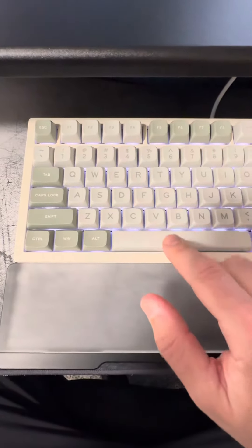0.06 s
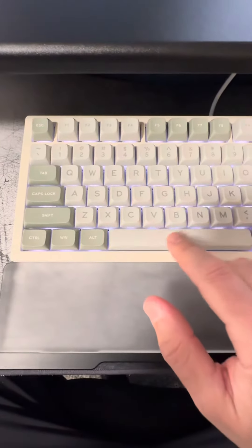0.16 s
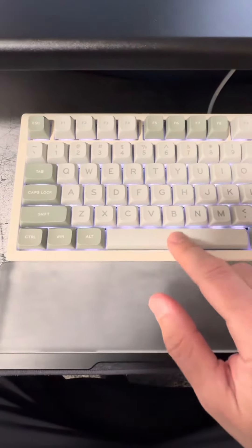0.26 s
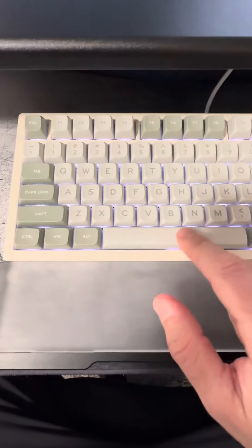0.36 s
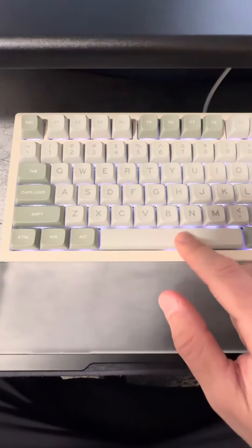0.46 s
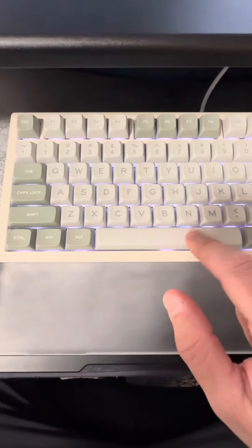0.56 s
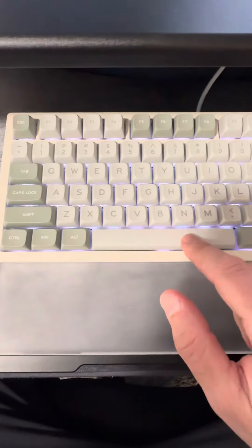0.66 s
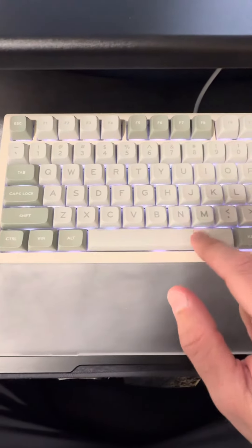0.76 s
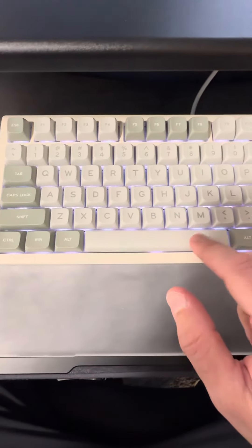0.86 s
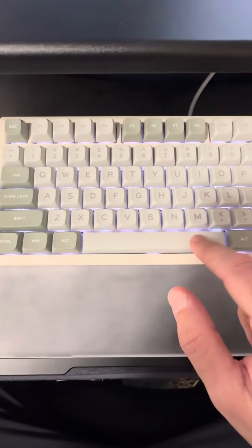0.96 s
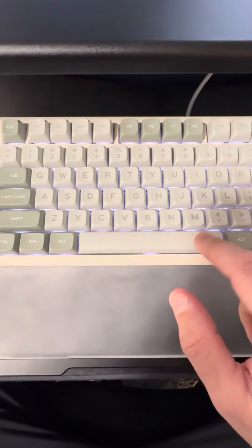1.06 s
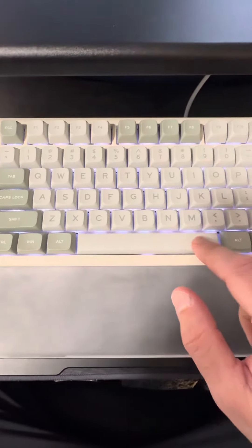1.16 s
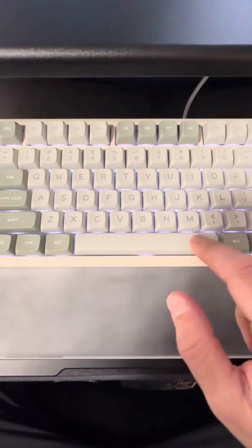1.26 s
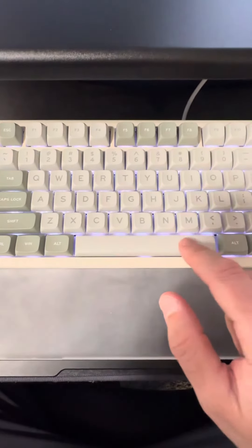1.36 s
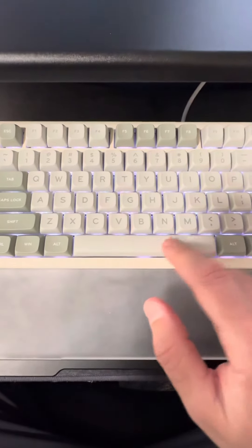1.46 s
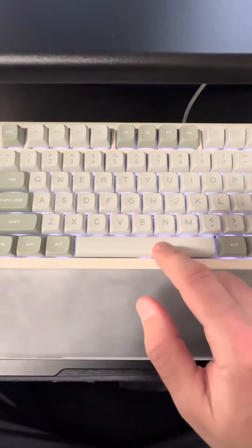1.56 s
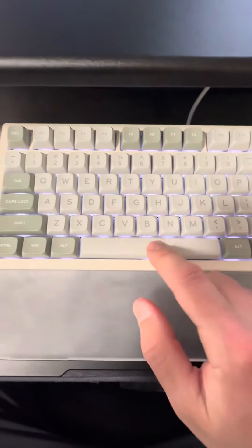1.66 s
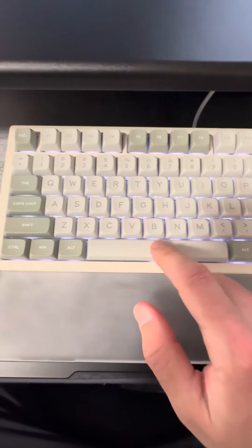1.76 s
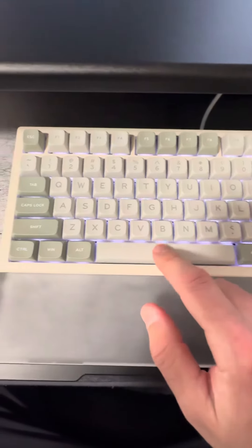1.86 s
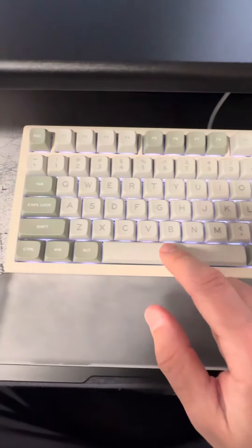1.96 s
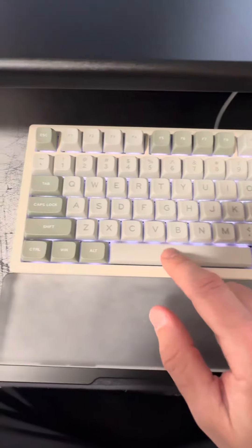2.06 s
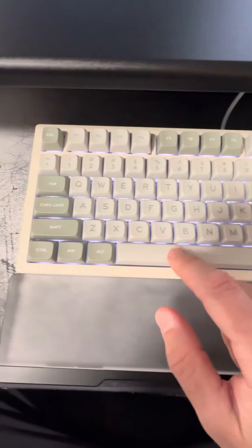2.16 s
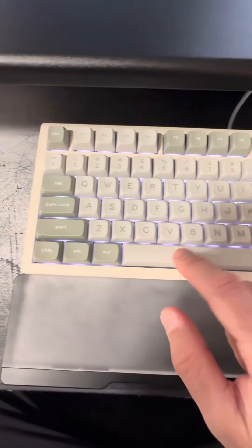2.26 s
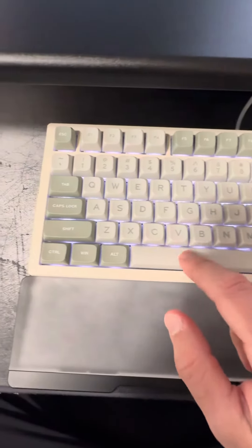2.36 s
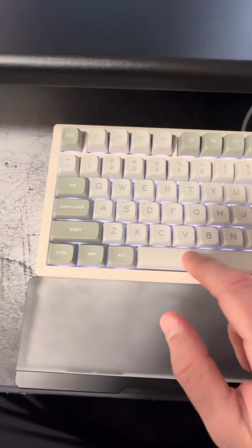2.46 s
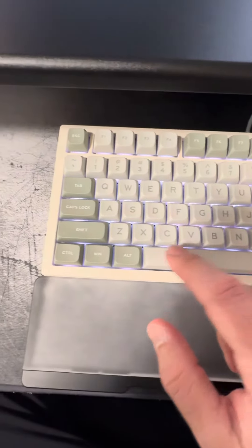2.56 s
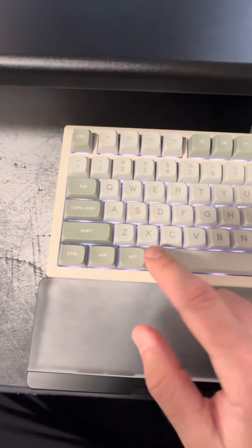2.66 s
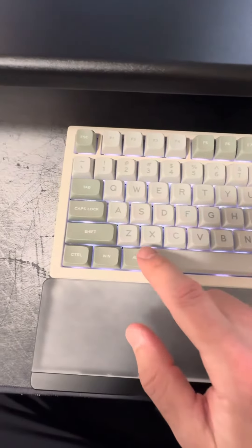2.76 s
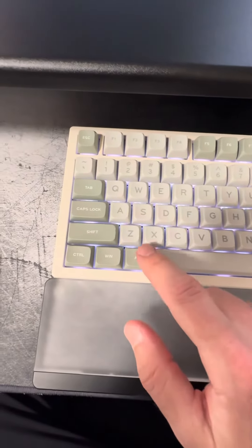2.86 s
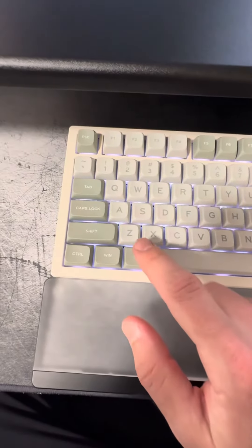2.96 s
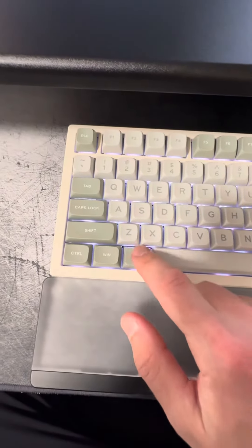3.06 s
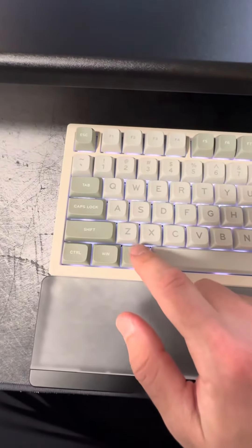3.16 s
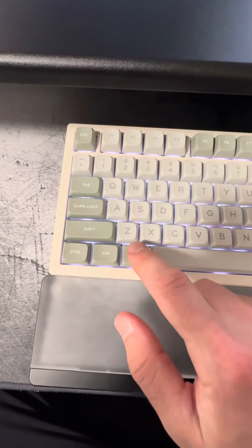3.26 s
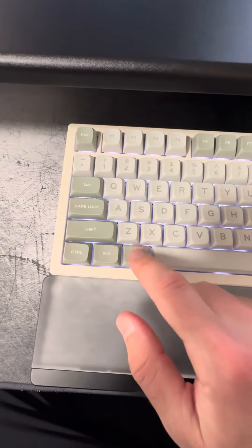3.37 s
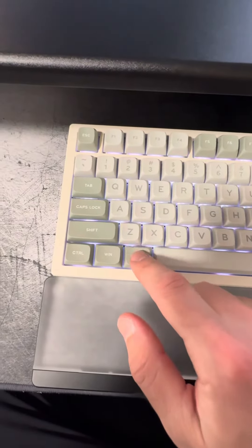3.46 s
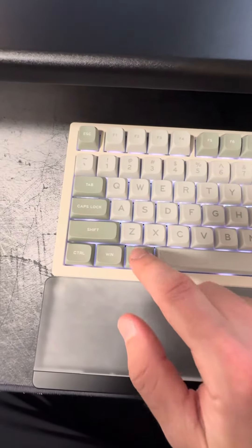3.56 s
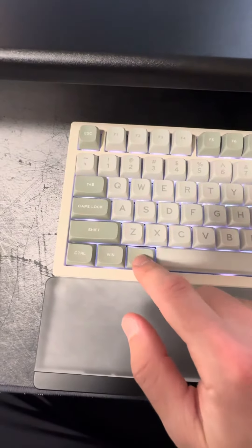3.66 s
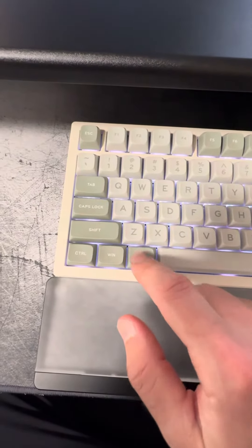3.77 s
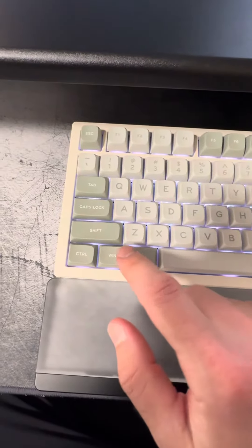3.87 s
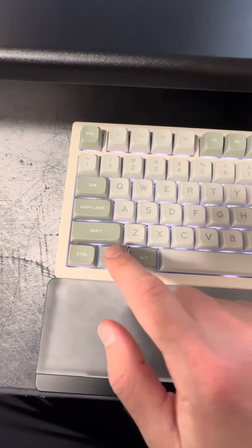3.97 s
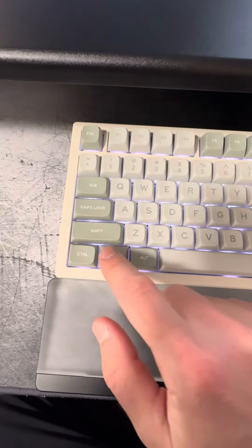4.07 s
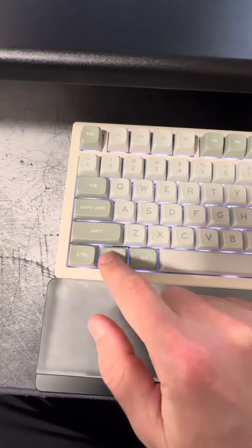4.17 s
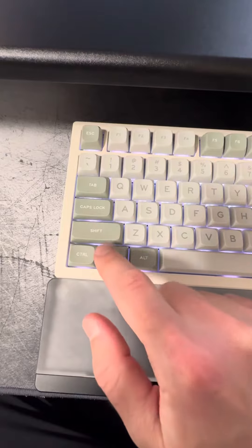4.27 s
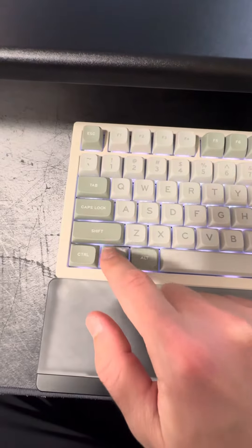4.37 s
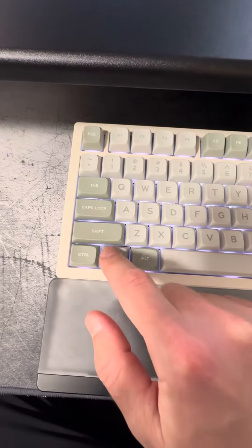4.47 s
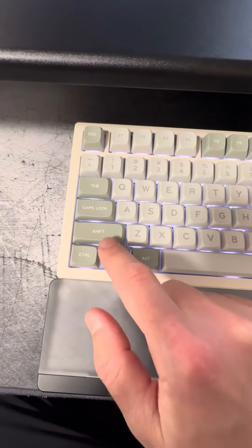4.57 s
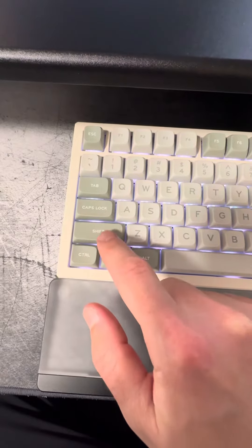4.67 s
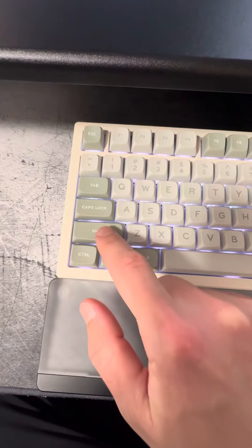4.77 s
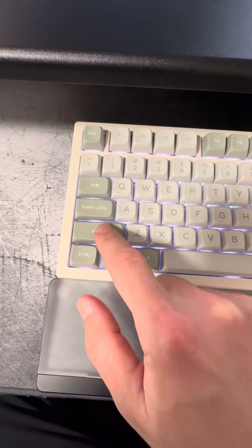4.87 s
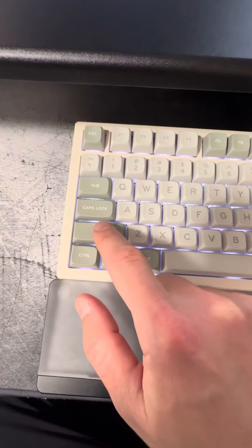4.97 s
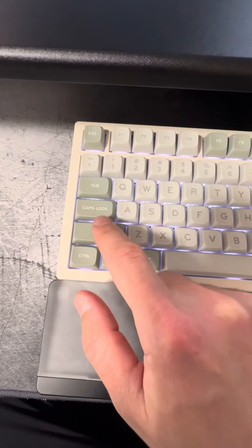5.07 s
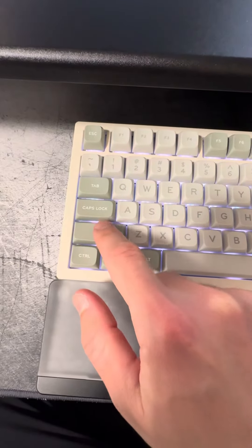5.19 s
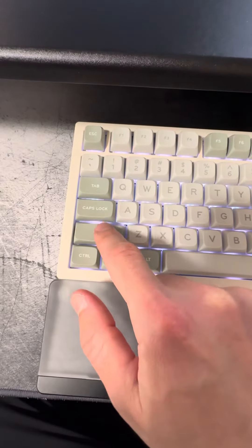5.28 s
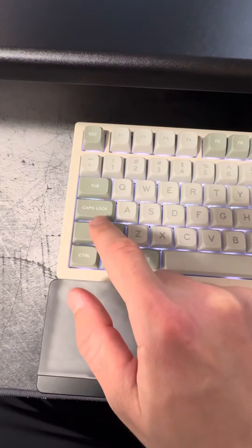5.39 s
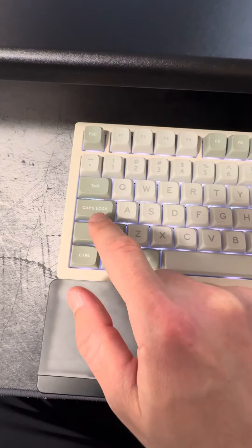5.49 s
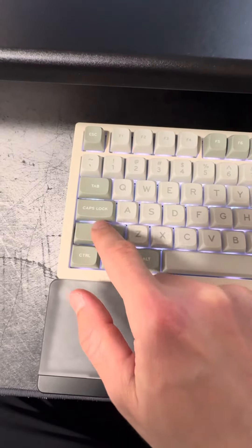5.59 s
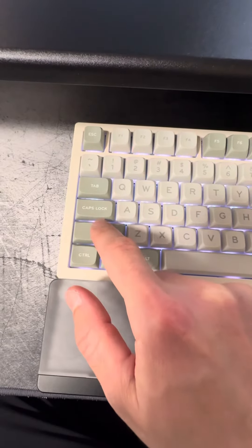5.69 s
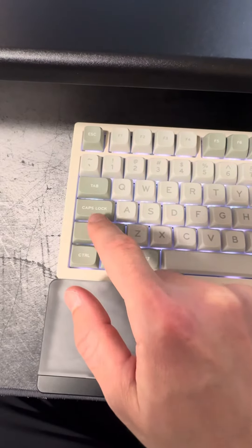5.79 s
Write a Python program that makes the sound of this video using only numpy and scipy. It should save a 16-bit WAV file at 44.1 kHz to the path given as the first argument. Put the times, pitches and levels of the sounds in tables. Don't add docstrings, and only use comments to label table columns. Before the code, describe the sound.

Very close to the microphone, a finger presses the long bar of a mechanical keyboard fourteen times, evenly, over five times a second, each full clack followed by a lighter release click. After a short pause come three crisp small-key presses, two harder, duller ones, and two broader ones with thin bright releases. Small indoor room, short reflections, very faint fan hum behind, stereo handheld microphone.

```python
import sys
import numpy as np
from scipy import signal
from scipy.fft import rfft, irfft, next_fast_len
from scipy.io import wavfile
from scipy.ndimage import map_coordinates

SR = 44100
rng = np.random.default_rng(int(sys.argv[2]) if len(sys.argv) > 2 else 0)


def ratio(d):
    e = np.asarray(d, float) / 20
    return 10 ** e


def pcm_store(signal):
    levels = np.round(np.clip(np.atleast_2d(signal), -1, 1) * 32767)
    wavfile.write(sys.argv[1], SR, levels.astype(np.int16).T)


N = 257103
GRID = 4096
SIDES = np.array([[.5], [-.5]])

# (time [s], peak [dB], 2.4 kHz [dB], 4 kHz [dB], treble [dB])
BAR_DOWN = [(0.0516, -11, -1.5, -0.5, 0.5), (0.2323, -8.5, -1, 2.5, 1), (0.399, -9.5, -1, -0.5, 1),
            (0.5905, -10, -1, 2, 2), (0.772, -10, -0.5, 1.5, 2.5), (0.958, -9.5, -1, 2, 1.5),
            (1.1325, -9.5, -0.5, 0.5, -0.5), (1.3041, -8, 0, 3, 0.5), (1.4872, -9.5, -1.5, 0, -1),
            (1.6639, -9.5, -0.5, 1, 2.5), (1.8288, -10, -0.5, -0.5, 1.5), (2.0118, -11, -1.5, 1.5, 2),
            (2.1844, -10, -0.5, 0, 1), (2.3698, -11, -1.5, -1, 1.5)]
BAR_UP = [(0.1339, -18.5, -6, 1.5, 2), (0.3146, -20, -6, -0.5, 0), (0.4874, -18.5, -4, -0.5, 2.5),
          (0.6802, -19, -4, -3.5, 2.5), (0.8604, -18.5, -4, -3, 1.5), (1.0382, -19, -4, -1, 0.5),
          (1.2161, -19, -4, 4, 3), (1.386, -18.5, -5, -0.5, 1), (1.5683, -18.5, -2.5, -1, 1.5),
          (1.742, -19, -1.5, -0.5, 0.5), (1.914, -20.0, -4, 3.5, -0.5), (2.0925, -19, -1, 3.5, 0),
          (2.2605, -18.5, -6.5, 2, 1.5), (2.4527, -19.5, -6, 1.5, 1)]
NEAR_DOWN = [
    (3.0419, -8.5, 2.5, 4.5, 4),
    (3.377, -7, 3.5, 4, 3.5),
    (3.6513, -7.5, 1.5, 5.5, 5),
]
NEAR_UP = [
    (3.1269, -26.5, -1, 2, 0.5),
    (3.4644, -30, -2, 0.5, -2.5),
    (3.7360, -25.5, -7.5, -5, 4.5),
]
CORNER_DOWN = [
    (4.099, -7.5, -4, 0.5, -4),
    (4.3645, -5.0, -1.5, 0.5, -1.5),
]
CORNER_UP = [
    (4.4647, -18, -1, 7.5, 2.5),
]
CORNER_SLIP = [
    (4.1959, -20.5, 3, -4.5, 3.5),
]
WIDE_DOWN = [
    (5.1792, -9.5, 3.5, 0, 1.5),
    (5.543, -9, 3.5, -1.5, 2),
]
WIDE_UP = [
    (5.3029, -23, 5.5, -0.5, 9),
    (5.6518, -25, 4, -2, 7),
]
# (time [s], peak [dB], 2.4 kHz [dB], 4 kHz [dB], treble [dB])
REBOUND = [
    (3.4772, -41, 6.5, 4, 3),
    (3.7386, -28, 2, 2, 7),
    (3.7407, -30.5, 3, -2.5, -19),
    (3.7468, -43.5, 5.5, -4, -2),
    (5.3048, -31, 1, 8, -6),
]
# (time [s], peak [dB])
EARLIER = [
    (-.04, -19),
]
# (time [s], peak [dB])
SLACK = [(0.107, -33.5), (0.2795, -37), (0.4431, -46.5), (0.579, -32), (0.7598, -30.5), (0.9448, -30.5),
         (1.1174, -29), (1.1935, -37.5), (1.2925, -25.5), (1.8994, -46.5), (2.0763, -47.5)]
# (time [s], peak [dB])
LEAF = [(0.1255, -43), (0.306, -50), (0.48, -44), (0.6715, -63), (0.853, -48), (1.03, -52), (1.114, -43),
        (1.2075, -52), (1.378, -47), (1.56, -46.5), (1.7335, -48), (1.906, -52), (2.0837, -44.5),
        (2.252, -44.5), (2.4445, -53.5)]
# (time [s], peak [dB], half length [ms])
TOUCH = [(0.04, -42.5, 5.6), (0.225, -41, 5.7), (0.393, -32, 6.6), (0.5797, -31, 2.3), (0.7614, -31, 3.5),
         (0.947, -30.5, 3.7), (1.12, -32, 3.3), (1.2926, -34, 3), (1.4768, -32, 5.7), (1.6525, -45, 3.5),
         (1.8183, -48, 3), (2, -45.5, 4.1), (2.172, -47, 3.2), (2.358, -40.5, 3), (3.0317, -39, 3.6),
         (3.369, -33, 3), (3.6417, -32.5, 2.9), (4.0867, -31.5, 3.6), (4.3566, -35.5, 4.1),
         (5.168, -50.5, 5.3), (5.5349, -51, 2.7)]

# (frequency [Hz], width [Hz], level [dB])
BAR_FLOOR = [(580, 680, -7.5), (1251, 73, -1.5), (2200, 84, 2.5), (2790, 66, -4.5), (3250, 58, -31.5),
             (3876, 560, -7.5), (4645, 11, -7), (5570, 74, -13), (6480, 26, -11), (6775, 240, -33.5),
             (8300, 21, -27.5), (10250, 200, -20), (12100, 900, -31.5), (15100, 955, -27.5)]
BAR_ROOF = [(378, 38, -2), (626, 25, -7), (1185, 180, 3.5), (1460, 160, -12.5), (2190, 300, -14),
            (2530, 180, -5), (2820, 150, -9), (3715, 220, -19), (4240, 200, -14), (5740, 80, -16.5),
            (6600, 150, -14), (7100, 98, -23.5), (10370, 600, -16.5), (13300, 2100, -28.5)]
NEAR_FLOOR = [(1246, 30, 0), (1780, 40, -0.5), (2415, 240, 0.5), (3120, 100, -24), (3744, 150, -4.5),
              (3960, 150, -9), (4430, 170, -41), (5460, 190, -12.5), (7260, 100, -35.5), (7860, 210, -5),
              (8360, 150, -24.5), (8900, 150, -5.5), (13200, 300, -17.5), (14150, 240, -11)]
NEAR_ROOF = [(1044, 98, -0.5), (1250, 59, 2.5), (1750, 52, -2), (2200, 150, 0), (4250, 200, -30),
             (5400, 680, -22.5), (7700, 200, -14), (9050, 170, -29), (14390, 500, -16.5), (14970, 210, -24)]
CORNER_FLOOR = [(1835, 170, -1), (2304, 186, -1), (3650, 55, -11), (3993, 102, -6.5), (4700, 100, -25),
                (5500, 200, -25), (6200, 94, -34), (6830, 350, -40), (7500, 89, -22.5), (8000, 154, -7.5),
                (9030, 200, -18), (11220, 350, -15), (14500, 200, -7.5)]
CORNER_ROOF = [(770, 140, -11), (1415, 140, 3), (1640, 150, -4), (2070, 220, 2.5), (2800, 120, -10),
               (3910, 170, -23.5), (7200, 160, -22), (8020, 190, -19.5), (9050, 200, -27), (9930, 200, -32),
               (14400, 330, -28)]
SLIP_ROOF = [(847, 130, -13.5), (1427, 250, -7), (1623, 200, -4.5), (1854, 100, 2), (2103, 180, -9.5),
             (2608, 280, -1.5), (2930, 150, -21), (4000, 300, -22), (7440, 150, -24), (8330, 153, -27.5),
             (14590, 370, -26)]
WIDE_FLOOR = [(1084, 193, -5), (1641, 480, -2), (2276, 256, -8.5), (2637, 78, -7), (3450, 300, -14.5),
              (5000, 300, -33.5), (5800, 1100, -21.5), (7040, 164, -23.5), (7880, 180, -33),
              (9100, 320, -21.5), (9900, 330, -18.5), (14330, 260, -22.5), (15000, 340, -30.5)]
WIDE_ROOF = [(485, 490, -15.5), (1194, 60, 2.5), (1860, 92, 0.5), (2205, 180, 1), (3110, 130, -29),
             (3780, 120, -12), (5730, 85, -17.5), (8100, 120, -29), (10190, 670, -15.5), (14100, 150, -43)]
# (frequency [Hz], width [Hz], level [dB])
TIPPING_CAP = [(635, 300, -8), (1304, 440, 3), (2495, 520, -14), (4029, 1500, -29), (8000, 2500, -41.5),
               (14740, 1500, -45)]
# (frequency [Hz], width [Hz], level [dB])
PAD = [(1300, 290, -1.5), (2400, 630, -6.5), (4204, 480, -23), (6220, 350, -20), (9300, 2000, -29),
       (15000, 2500, -35.5)]
# (frequency [Hz], width [Hz], level [dB])
CASE = [(181.4, 49, -28), (5830, 62, -8.5), (8200, 270, -23.5), (9800, 52, -26.5)]
# (frequency [Hz], width [Hz], level [dB])
SKIN = [(11190, 2300, -25.5)]
# (frequency [Hz], width [Hz], depth [dB])
BAR_DIPS = [(4980, 120, -4.5), (7700, 380, -5), (9300, 300, -7)]
# (frequency [Hz], level [dB])
STEM = [(300, -12.5), (900, -2), (1500, -5), (2800, -3), (5000, -16), (9000, -31), (16000, -45.5)]
# (frequency [Hz], delay [ms])
ARRIVAL = [(300, 2), (600, 2.59), (1200, 1.32), (2200, 0.38), (3500, 0.45), (4600, 0.37), (5800, 1.1),
           (6800, 0.9), (8200, 0.5), (8800, 1.0), (10500, 0.44), (12500, 0.9), (15000, 0.15)]

# (frequency [Hz], level against the stroke [dB], t60 [s])
WIRE = [(5980, -35, 0.12), (6720, -46.5, 0.14), (8526, -44.5, .2), (9370, -59.5, 0.17), (10220, -46, .2),
        (14930, -61, .12)]
SHORT_WIRE = [(5880, -44.5, .1)]
SPRING = [(8070, -52.5, 0.091), (14450, -53, .1)]

# (time [s], level [dB])
BUSTLE = [
    (0, -72),
    (.8, -63),
    (1.6, -65.5),
    (2.45, -65.5),
    (2.6, -94),
    (5.83, -100),
]
# (frequency [Hz], level [dB])
HAND = [(50, -28), (90, -9.5), (150, -7), (220, -12), (300, -35), (5000, -43), (6500, -27), (7400, -43),
        (8500, -24), (9500, -40.5), (10200, -26), (10800, -48.5), (16000, -59.5)]
# (time [s], frequency [Hz], length [s], level [dB])
DESK = [
    (4.435, 131.9, 0.037, -57),
    (5.567, 136, 0.016, -53.5),
]

# (frequency [Hz], t60 [s])
ROOM_T60 = [(300, 0.26), (1000, 0.17), (2500, 0.24), (6000, 0.22), (10400, 0.28), (11200, .24),
            (14500, 0.24)]
# (frequency [Hz], level [dB])
ROOM_DB = [(300, 4), (600, -1), (1200, -12), (2200, -19), (3300, -18.5), (4800, -12.5), (6400, -5),
           (7000, -15.5), (7600, -19), (8500, -12), (9600, -20), (10250, -14.5), (10900, -21.5),
           (12500, -15.5), (14200, -23), (16000, -38.5)]
# (frequency [Hz], level [dB])
ROOM_SPREAD = [(400, -10), (1200, -6), (2200, 2), (3500, 3), (4800, 1), (6500, -5.5), (10000, -11.5),
               (12000, -21.5), (14000, -20)]
# (delay [s], level [dB])
ECHOES = [
    (.0048, -19),
    (.0095, -22.5),
    (0.0106, -23),
    (0.019, -28.5),
    (0.022, -37),
]

# (time [s], level [dB], frequency [Hz])
WHINE = [
    (0, -71, 3275),
    (1.2, -81, 3240),
    (2.5, -77.5, 3260),
    (3.1, -80.5, 3250),
    (3.8, -79, 3264),
    (4.7, -82.5, 3260),
    (5.1, -94, 3220),
    (5.83, -92, 3164),
]
# (frequency [Hz], width [Hz], level [dB])
FAN_LINES = [(206, 5.5, -73), (424, 20, -75), (1053, 21, -82.5)]
# (frequency [Hz], level per Hz [dB])
AIR = [(44, -33), (75, -3.5), (81, -11), (161, -10), (182, -14.5), (215, -13.5), (244, -15.5), (435, -14.5),
       (658, -14.5), (1060, -14.5), (1260, -19), (1500, -24.5), (2800, -28), (3370, -34), (3890, -40),
       (9600, -46), (13600, -83.5), (22000, -120)]
# (frequency [Hz], correlation [-1 to 1])
AIR_ALIKE = [(60, 0.97), (130, 0.67), (290, 0.44), (640, 0.03), (1410, 0.35), (3100, -0.09), (6820, -0.03),
             (15000, -0.77)]
# (frequency [Hz], level [dB])
AIR_BALANCE = [(60, -4), (150, -0.5), (380, -2.5), (950, -7.5), (2380, -2), (5980, -1), (15000, -1)]

# (frequency [Hz], level [dB])
PORT_DB = [(300, -2), (500, -4.5), (700, -11.5), (1000, -2), (1500, -0.5), (2200, 0), (3000, -5.5),
           (4000, 2), (5500, 5), (7000, 0), (9000, 2), (11500, 1), (12600, 3.5), (13600, 1), (14500, 0)]
# (frequency [Hz], lead [rad])
PORT_LEAD = [(300, .2), (500, -.25), (750, .6), (1000, .65), (1500, .45), (2200, .15), (3000, .45),
             (4000, .9), (5000, .5), (7000, -1.4), (8000, -1.9), (10000, -2.3), (11000, -2.75),
             (12300, -2.85), (12900, -3.6), (15300, -4.3), (16000, -5.8), (17000, -6.2)]
# (frequency [Hz], level [dB])
MICROPHONE = [(100, 0), (15300, -0.5), (16100, -13), (16600, -15.5), (16850, -32.5), (17050, -62),
              (22050, -90)]


def unit(x):
    return x / np.sqrt(np.mean(x ** 2) + 1e-20)


def along(points, hz):
    f, v = np.transpose(points)
    return np.interp(np.log(hz + 1), np.log(f + 1), v)


def curves(rows):
    s, *cols = np.transpose(rows)
    return [np.interp(np.arange(N) / SR, s, c) for c in cols]


def filtered(x, response):
    m = next_fast_len(N + SR // 2)
    return irfft(rfft(x, m) * response(np.fft.rfftfreq(m, 1 / SR)), m)[..., :N]


def causal(gain):
    fold = irfft(np.log(gain + 1e-6))
    fold[1:GRID // 2] *= 2
    fold[GRID // 2 + 1:] = 0
    return np.exp(rfft(fold))


def resonance(f, centre_hz, width_hz):
    damping = (f * width_hz) ** 2
    return damping / ((centre_hz ** 2 - f ** 2) ** 2 + damping)


def rush(gain, alike):
    def split(hz):
        turn = np.arccos(np.clip(along(alike, hz), -1, 1)) / 2
        return gain(hz) * np.array([np.cos(turn), np.sin(turn)])

    mid, side = filtered(rng.standard_normal((2, N)), split)
    return unit(np.array([mid + side, mid - side]))


def fan():
    def narrow(centre_hz, width_hz):
        return rush(lambda hz: 1 / (1 + ((hz - centre_hz) / width_hz) ** 2), AIR_ALIKE)

    def tone(hz):
        return np.sin(2 * np.pi * np.cumsum(hz) / SR + 0.3 * narrow(0, 3))

    rotor_hz = 62 + 0.89 * narrow(0, 2.3)[0]
    hum = ratio(-65 - 2.1 * SIDES) * np.sin(2 * np.pi * np.cumsum(rotor_hz) / SR)
    flutter = ratio(-61 - 1.5 * SIDES) * narrow(55.03, 2.1)
    throb = ratio(-68.5) * rush(lambda hz: 1 / (1 + ((hz - 48) / 10) ** 4), [(50, 0.72)])
    lines = sum(ratio(db) * narrow(hz, width) for hz, width, db in FAN_LINES)
    whine_db, whine_hz = curves(WHINE)
    twin = ratio(-10.5) * tone(whine_hz + 93)
    whistle = ratio(whine_db) * (tone(whine_hz) + twin)
    air = ratio(-63) * rush(lambda hz: ratio(along(AIR, hz)), AIR_ALIKE)
    upper = filtered(lines + whistle + air, lambda hz: ratio(SIDES * along(AIR_BALANCE, hz)))
    return hum + flutter + throb + upper


def hand():
    lumps_hz = 14
    knots = rng.standard_normal(int(lumps_hz * N / SR) + 4)
    lumps = map_coordinates(knots, [np.arange(N) * lumps_hz / SR])
    noise = unit(filtered(rng.standard_normal(N), lambda hz: ratio(along(HAND, hz))))
    return ratio(curves(BUSTLE)[0] + 2.6 * lumps) * noise


def room(x):
    hz, t, z = signal.stft(rng.standard_normal((2, SR // 4)), SR, nperseg=128)
    t = np.arange(z.shape[2]) * t[1]
    z[1] *= ratio(along(ROOM_SPREAD, hz))[:, None]
    decay_db = along(ROOM_DB, hz)[:, None] - 60 * t / along(ROOM_T60, hz)[:, None]
    tail = signal.istft(z * ratio(decay_db), SR, nperseg=128)[1]
    time = np.arange(tail.shape[1]) / SR
    tail *= np.clip(time / 0.0012, 0, 1) / np.sqrt(0.02 * SR)
    for s, db in ECHOES:
        at = round(s * SR)
        tail[0, at:at + 9] += ratio(db) * np.hanning(9) / 4
    return signal.fftconvolve(x[None], tail, axes=1)


def strokes(rows, body_db, click_db, room_db):
    padded = [(*row, 0, 0, 0)[:5] for row in rows]
    s, db, knock_db, edge_db, own_db = np.transpose(padded)
    colour = 0.56 * rng.standard_normal((len(rows), 3)) + [body_db, click_db, room_db]
    edge_db = edge_db + colour[:, 1] / 2
    colour = colour + np.outer(own_db, [0, 1, 0])
    return np.column_stack([s, db, knock_db, edge_db, colour])


def contacts(events, resonances, thin, loss, steep, spread, notch_db, early, rattle_db, rattle_t60, slide_db,
             dips=(), boom_db=0):
    out = np.zeros((2, N + 2 * SR))
    f, t = np.fft.rfftfreq(GRID, 1 / SR), np.arange(GRID) / SR
    centre, width, level = np.transpose(resonances + SKIN)[:, :, None]
    width = width + loss / (1 + (centre / 3500) ** 4) + spread * centre
    lead = GRID // 4 / SR
    delay = np.exp(-2j * np.pi * np.cumsum(along(ARRIVAL, f) / 1000 + lead) * f[1])
    onset = ratio(np.minimum(0, 12000 * (t - lead + 0.0014)))
    rattle_shape = ratio(rattle_db - 60 * t / rattle_t60) + ratio(rattle_db - 19.5 - 60 * t / 0.028)
    habit = rng.standard_normal(GRID)
    for s, db, knock_db, edge_db, body_db, click_db, room_db in events:
        luck = rng.standard_normal((2, len(centre), 1))
        peaks = resonance(f, centre * (1 + 0.0014 * luck[0]), width)
        power = np.sum(ratio(level + 0.5 * luck[1]) ** 2 * peaks ** steep, axis=0)
        tilt_db = along([(500, body_db), (1100, 0.017), (1600, 0.015), (2400, knock_db), (4000, edge_db),
                         (5800, click_db)], f)
        tilt_db += notch_db / (1 + ((f - 790) / 55) ** 2)
        tilt_db += sum(deep_db / (1 + ((f - gap_hz) / wide) ** 2) for gap_hz, wide, deep_db in dips)
        body = causal(np.sqrt(power) * ratio(tilt_db) / np.sqrt(1 + (thin / (f + 1)) ** 4))
        body = body ** (1 - early / 2) * np.conj(body) ** (early / 2)

        rattle = rattle_shape * (0.79 * habit + 0.5 * rng.standard_normal(GRID))
        push = 1 + rfft(rattle) * f ** 2 / (f ** 2 + 4500 ** 2)
        blow = onset * irfft(push * body * delay)
        blow /= np.abs(blow).max()
        start = np.argmax(np.abs(blow) > 0.3)
        since = t - start / SR

        slide = unit(irfft(rfft(rng.standard_normal(GRID)) * ratio(along(STEM, f))))
        blow += ratio(slide_db) * slide * np.interp(since, [-0.016, -0.003, 0], [0, 2.9, 0])
        blow *= ratio(db + 2.5)
        at = SR + round(s * SR) - start
        out[0, at:at + GRID] += blow

        sent = blow * ratio(-60 * np.maximum(0, since) / 0.015)
        sent = irfft(rfft(sent) * ratio(along([(800, boom_db), (1700, 0.00055)], f)))
        tail = ratio(room_db + 2.5) * room(sent)
        out[:, at:at + tail.shape[1]] += tail
    return out[:, SR:SR + N]


def long_bar():
    up = contacts(
        strokes(EARLIER + BAR_UP, body_db=0, click_db=-1, room_db=1), CASE + BAR_ROOF,
        thin=340, loss=52, steep=1, spread=0.0016, notch_db=-7, early=0.23,
        rattle_db=-10, rattle_t60=0.0095, slide_db=-52, dips=BAR_DIPS, boom_db=-1)
    down = contacts(
        strokes(BAR_DOWN, body_db=-2.13, click_db=0.4, room_db=-1.74), CASE + BAR_FLOOR,
        thin=392, loss=220, steep=1.228, spread=0.0024, notch_db=-20, early=0.26,
        rattle_db=-11, rattle_t60=0.0014, slide_db=-56, dips=BAR_DIPS, boom_db=2)
    tipping = contacts(
        strokes(SLACK, body_db=3, click_db=-8.5, room_db=1), TIPPING_CAP,
        thin=950, loss=20, steep=0.7, spread=0.001, notch_db=-3.5, early=0.17,
        rattle_db=-10.5, rattle_t60=0.0075, slide_db=-39.5, boom_db=-1)
    return up + down + tipping


def fingertip():
    out = np.zeros((2, N + SR))
    f, t = np.fft.rfftfreq(GRID, 1 / SR), (np.arange(GRID) - GRID // 4) / SR
    cap = causal(sum(ratio(db) * resonance(f, hz, width) for hz, width, db in PAD))
    for s, db, half_ms in TOUCH:
        grain = rng.standard_normal(GRID) * np.exp(-(1000 * t / half_ms) ** 2)
        scrape = irfft(cap * rfft(grain))
        scrape *= ratio(db) / np.abs(scrape).max()
        at = round(s * SR) - GRID // 4
        out[0, at:at + GRID] += scrape
        tail = ratio(-2) * room(scrape)
        out[:, at:at + tail.shape[1]] += tail
    return out[:, :N]


def ringing(rows, modes):
    out, t = np.zeros(N + SR), np.arange(SR // 6) / SR
    hz, level_db, t60 = np.transpose(modes)[:, :, None]
    for s, db, *_ in rows:
        steps = 0.14 * rng.standard_normal((len(hz), len(t) // 16 + 1))
        wander = np.cumsum(steps, axis=1).repeat(16, axis=1)[:, :len(t)]
        scatter_db = 2.5 * rng.standard_normal(hz.shape)
        size = ratio(db + level_db + scatter_db - 60 * t / t60)
        ring = np.sum(size * np.sin(2 * np.pi * hz * t + wander), axis=0)
        at = round(s * SR)
        out[at:at + len(t)] += ring * (1 - np.exp(-t / 0.0016))
    return out[:N]


def steel():
    wide = WIDE_DOWN + WIDE_UP
    small = NEAR_DOWN + NEAR_UP + CORNER_DOWN + CORNER_UP + CORNER_SLIP + wide
    return ringing(BAR_DOWN + BAR_UP, WIRE) + ringing(small, SPRING) + ringing(wide, SHORT_WIRE)


def leaf():
    tick_hz, tick_s = 2495, 0.00062
    t = np.arange(N) / SR
    out = np.zeros(N)
    for s, db in LEAF:
        near = slice(round(s * SR) - 200, round(s * SR) + 200)
        since = t[near] - s
        out[near] += ratio(db) * np.exp(-(since / tick_s) ** 2) * np.sin(2 * np.pi * tick_hz * since)
    return out


def near_key():
    down = contacts(
        strokes(NEAR_DOWN, body_db=2.5, click_db=-8, room_db=-3.5), NEAR_FLOOR,
        thin=490, loss=198, steep=1.204, spread=0.01, notch_db=3, early=0.1,
        rattle_db=-14.5, rattle_t60=0.0044, slide_db=-61, boom_db=4.5)
    up = contacts(
        strokes(NEAR_UP, body_db=1.5, click_db=0, room_db=0.4), NEAR_ROOF,
        thin=118, loss=43, steep=1.03, spread=0.019, notch_db=6, early=0.13,
        rattle_db=-17.5, rattle_t60=0.015, slide_db=-41.5)
    return down + up


def rebound():
    return contacts(
        strokes(REBOUND, body_db=1.5, click_db=3, room_db=-0.2), NEAR_ROOF,
        thin=220, loss=90, steep=1.16, spread=0.019, notch_db=-7, early=0.15,
        rattle_db=-12.5, rattle_t60=0.004, slide_db=-70)


def corner_key():
    down = contacts(
        strokes(CORNER_DOWN, body_db=5.5, click_db=-9.5, room_db=-3), CORNER_FLOOR,
        thin=970, loss=170, steep=1.14, spread=0.025, notch_db=0, early=0.2,
        rattle_db=-21.5, rattle_t60=0.012, slide_db=-54)
    slip = contacts(
        strokes(CORNER_SLIP, body_db=4, click_db=-7.5, room_db=-0.5), SLIP_ROOF,
        thin=480, loss=60, steep=1.5, spread=0.01, notch_db=0, early=0.2,
        rattle_db=-2, rattle_t60=0.0042, slide_db=-62.5, boom_db=-5.5)
    up = contacts(
        strokes(CORNER_UP, body_db=4.5, click_db=-9.5, room_db=1.5), CORNER_ROOF,
        thin=280, loss=85, steep=1.76, spread=0.0093, notch_db=3.5, early=0.088,
        rattle_db=1, rattle_t60=0.0063, slide_db=-61, boom_db=5.5)
    return down + slip + up


def wide_key():
    down = contacts(
        strokes(WIDE_DOWN, body_db=4, click_db=-5.5, room_db=-1.5), WIDE_FLOOR,
        thin=110, loss=59, steep=1.62, spread=0.041, notch_db=-2, early=0.084,
        rattle_db=-8, rattle_t60=0.0054, slide_db=-62, boom_db=2)
    up = contacts(
        strokes(WIDE_UP, body_db=9.5, click_db=-4, room_db=0.5), WIDE_ROOF,
        thin=270, loss=120, steep=1.38, spread=0.029, notch_db=9, early=0.25,
        rattle_db=-11, rattle_t60=0.0084, slide_db=-51)
    return down + up


def ports(x):
    def response(hz):
        return ratio(SIDES * along(PORT_DB, hz)) * np.exp(1j * SIDES * along(PORT_LEAD, hz))

    return filtered(x, response)


def keyboard():
    keys = long_bar() + fingertip() + near_key() + rebound() + corner_key() + wide_key()
    shared, diffuse = keys
    return ports(hand() + steel() + leaf() + shared + 2 * SIDES * diffuse)


def desk():
    t = np.arange(N) / SR
    out = np.zeros(N)
    for s, hz, length, db in DESK:
        out += ratio(db) * np.exp(-((t - s) / length) ** 2) * np.sin(2 * np.pi * hz * t)
    return out


def scene():
    return fan() + keyboard() + desk()


def band_limit(x):
    return signal.sosfilt(signal.butter(12, 17040, fs=SR, output="sos"), x)


def record(dry):
    mix = filtered(dry, lambda hz: ratio(along(MICROPHONE, hz)))
    return band_limit(mix)


dry = scene()
out = record(dry)
pcm_store(out)
```